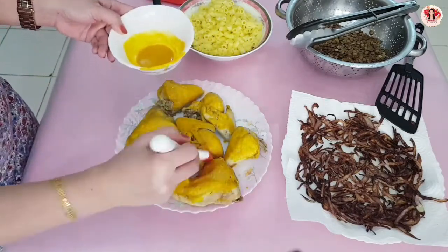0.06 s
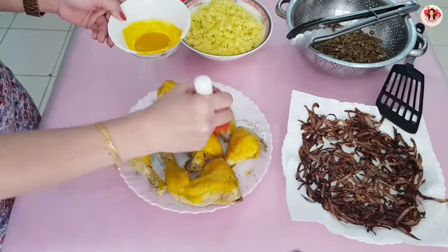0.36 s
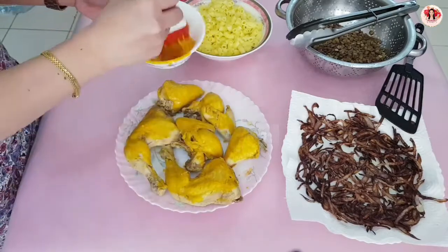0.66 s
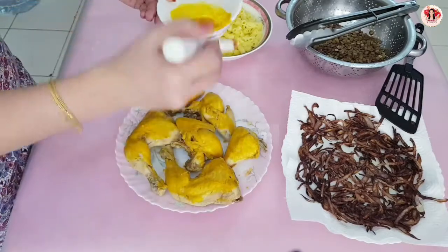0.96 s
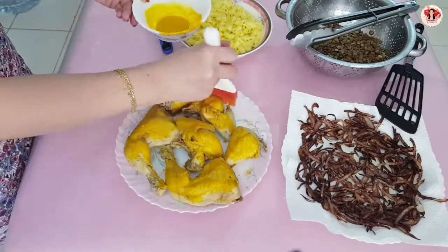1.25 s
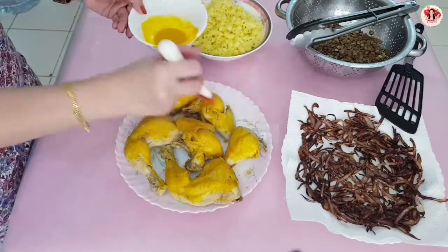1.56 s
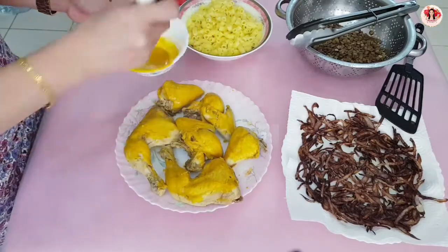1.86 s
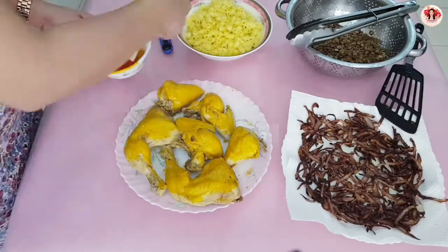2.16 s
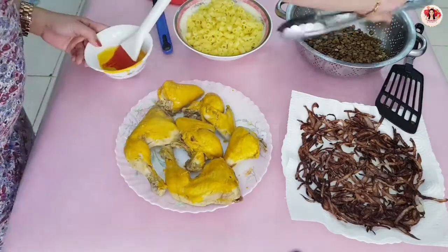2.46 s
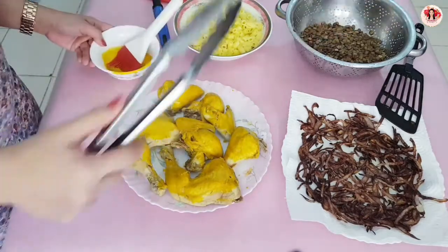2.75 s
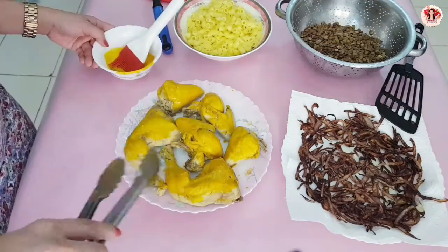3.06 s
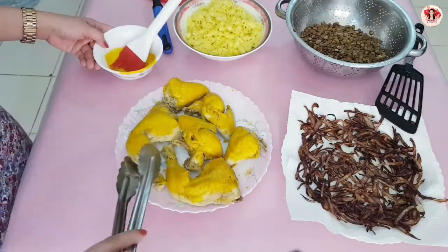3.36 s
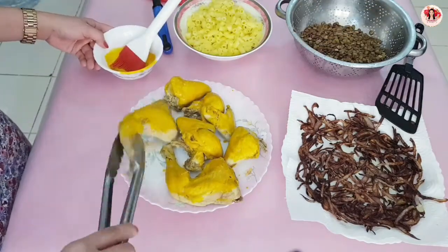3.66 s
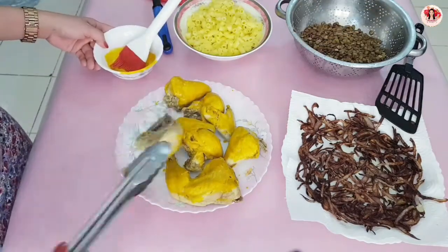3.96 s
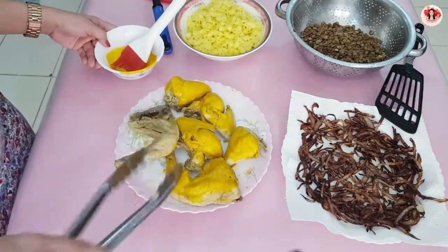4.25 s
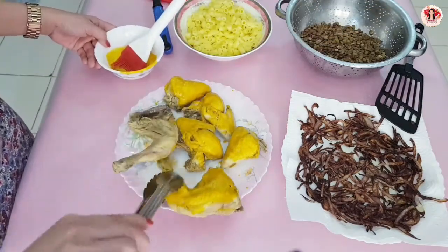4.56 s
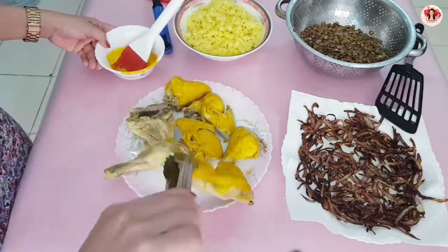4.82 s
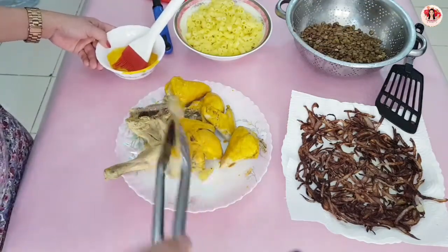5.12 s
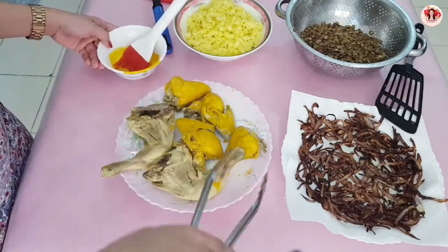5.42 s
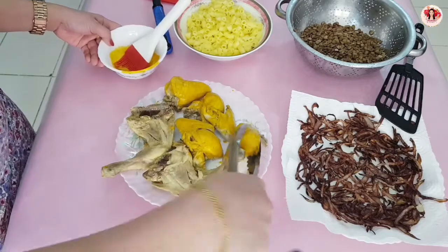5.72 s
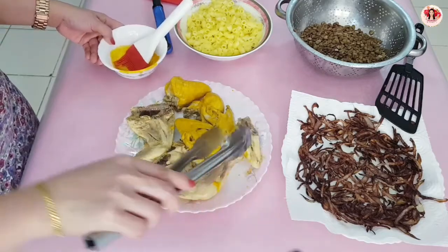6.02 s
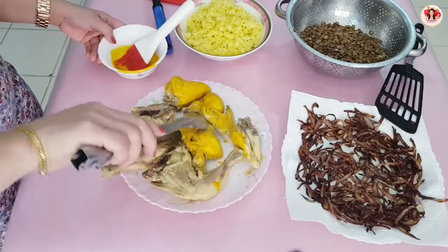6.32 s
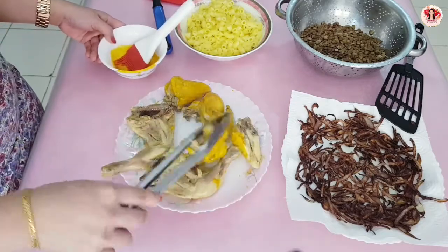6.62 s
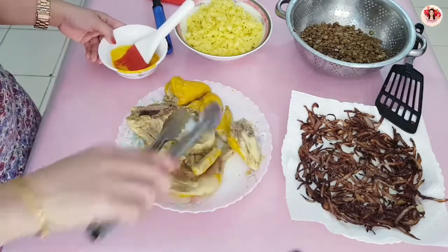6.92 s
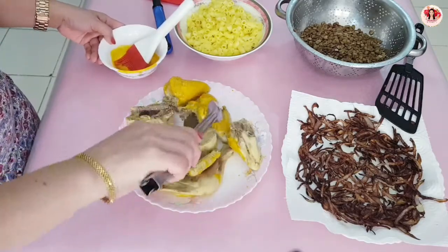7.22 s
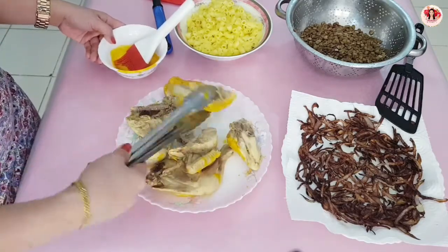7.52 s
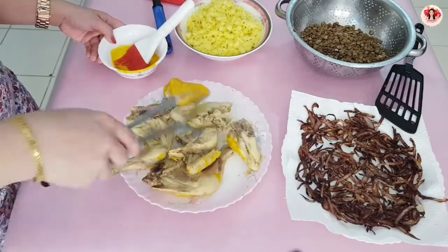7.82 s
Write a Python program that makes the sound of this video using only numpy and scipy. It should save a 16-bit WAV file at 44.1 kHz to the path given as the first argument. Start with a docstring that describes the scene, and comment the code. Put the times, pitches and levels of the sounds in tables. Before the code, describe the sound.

A fan runs throughout in a small, dry kitchen, giving a low hum, soft airflow and a faint tick about eleven times a second. For two seconds it is the only sound. At about 2.1 seconds a brush drops into a small china bowl with a bright, short clink, followed by a soft table thud. Steel tongs scrape and click as they are picked up between 2.5 and 3.1 seconds, with a brief sleeve swish near 2.8. They clack sharply against a plate at 3.2 seconds, with soft table thuds there and just after, then clack again at 4.2 and click at 4.4. From about 3.4 seconds wet chicken squelches quietly as it is turned. Lighter clicks and short scrapes continue, with plate taps near 5.9 and 7.1 seconds, and the sticky crackling grows slightly before the end near 8 seconds. All the handling sounds close.

```python
"""Steel tongs, taken from a colander, turn pieces of wet chicken on a plate: impacts excite the modes of
steel and china, utensils scrape by stick-slip friction, and peeling skin squelches. Just before, a brush
drops into a small china bowl, which rings; a sleeve swishes and the kitchen table thuds, all close by in
a small dry room. Behind them a fan hums over its airflow, and its guard ticks faintly on every turn."""
import sys
import numpy as np
from scipy import signal
from scipy.fft import rfft, irfft
from scipy.io import wavfile
from scipy.ndimage import uniform_filter1d

SR = 44100
rng = np.random.default_rng(int(sys.argv[2]) if len(sys.argv) > 2 else 0)


def waveform_to_disk(signal):
    """Save audio, clipped to [-1, 1], as 16-bit WAV at the path in sys.argv[1]."""
    frames = np.transpose(np.atleast_2d(signal))
    scaled = np.clip(frames, -1, 1) * 32767
    samples = np.round(scaled).astype(np.int16)
    wavfile.write(sys.argv[1], SR, samples)


N = 347508
SIZE = 16384  # samples in one short sound
T, HZ = np.arange(SIZE) / SR, np.fft.rfftfreq(SIZE, 1 / SR)


# Normal modes of the steel arms: f/Hz, relative level/dB, T60/s
TONGS_MODES = [(1078, 14, 0.059), (1786, 5.5, 0.041), (2100, -1, 0.021), (2600, 1, 0.028), (3030, 3, .1),
               (3380, 5, 0.1), (3840, 5, .05), (3990, 2, 0.053), (5450, -2, 0.05), (6050, 10, 0.049),
               (6600, 8, 0.037), (7150, 3, 0.067), (7580, 5, 0.11), (8900, 9, 0.055), (9890, -4, .1),
               (11050, 9, 0.07), (12300, -3, .12), (13900, 0, .08), (15000, -6, .1)]
# Clicks, mostly of the tongs; at 4.222 s a faint, short tick of hiss comes just before the loud clack:
# t/s, relative level/dB, low band re middle/dB, chatter time/s, ring f/Hz
CLICK_EVENTS = [(2.552, -41.5, -3, .005, 6760), (2.608, -47, -10, 0.0054, 7150),
                (2.6195, -32, -5.5, .002, 7150), (2.89, -49.5, -10, 0.0034, 9500),
                (2.942, -31, -19, .0057, 8650), (3.2187, -26.5, -3, 0.0012, 5730),
                (3.268, -52.5, 9, 0.0028, 1080), (3.734, -46.5, 1.5, .002, 4070),
                (4.222, -46, -7, 0.0062, 9500), (4.2407, -27.5, -9, 0.003, 2120),
                (4.4455, -35, -16, .0048, 1080), (4.573, -58, -11, .001, 7500),
                (4.905, -51.5, -13, 0.0016, 12000), (4.9959, -47.5, -10, .002, 8400),
                (5.436, -49, -3, 0.0023, 11300), (5.539, -54.5, -2, 0.00077, 4580),
                (5.6554, -43.5, -12, 0.0037, 9500), (6.664, -54, -7, .003, 2600),
                (6.748, -48, -5, .004, 2400), (7.038, -55, -4, .002, 3000), (7.188, -51, 3, .0034, 1400),
                (7.263, -55, -9, .002, 11000)]

def tongs_clicks(impacts, top_db=-0.8, ring_lift_db=9.5):
    """Impact excitation: the jaws chatter for a few milliseconds, which sets the steel arms ringing."""
    out = np.zeros((2, N))
    for start, db, low_db, chatter_s, ring_hz in impacts:
        age = T / chatter_s
        force = flatten(rfft(rng.standard_normal(SIZE) * (1 - np.exp(-3 * age)) * np.exp(-age)))
        arms = modal_response(TONGS_MODES, spread_db=3)
        freedom = amp(0.27 * min(db + 35, 0))  # light touches press into the meat, which damps the steel
        body = flatten(force * (1 + freedom * arms), bins=601)
        resonance = 1 + (amp(ring_lift_db) - 1) / (1 + 1j * (HZ - ring_hz) / 280)
        click = fixed_energy(waveform(body * contact_spectrum(low_db, top_db) * resonance))
        gain = amp(db - 2.5) * band_sum(low_db, top_db)
        add(out, start, kitchen(gain * click, near_db=2.5, tail_db=-2), pan_db=0.6)
    return out


def tongs_grazes(first_s=5.75, slot_s=0.14, low_db=2, chatter_s=0.0044):
    """Weak, damped impacts: the tips graze once in each time slot, at a random moment."""
    impacts = []
    for slot in np.arange(first_s, N / SR - slot_s, slot_s):
        start = slot + rng.uniform(0, slot_s)
        db, ring_hz = rng.uniform(-61.5, -59.5), rng.uniform(2500, 9700)
        impacts.append((start, db, low_db, chatter_s, ring_hz))
    return tongs_clicks(impacts)


# Utensils rubbing on steel, china and meat, starting with a faint hiss as the brush settles:
# start t/s, end t/s, relative level/dB, low band re middle/dB
UTENSIL_SLIDES = [(2.241, 2.52, -66, -8), (2.503, 2.609, -46, -6.5), (2.928, 2.967, -35, -14),
                  (3.038, 3.096, -41.5, -13), (3.445, 3.585, -53, -5.5), (3.72, 3.856, -46, -2),
                  (3.842, 3.911, -50, 1.5), (3.975, 4.043, -52, -1.5), (4.123, 4.162, -55.5, -2),
                  (4.643, 4.695, -52.5, -1), (4.904, 4.948, -55.5, 2.5), (4.991, 5.03, -52.5, -7),
                  (5.094, 5.151, -53.5, -3.5), (5.676, 5.717, -54.5, -4), (7.304, 7.353, -47, -5),
                  (7.478, 7.539, -47.5, -0.5), (7.708, 7.75, -49, -5)]

def utensil_scrapes():
    """Stick-slip friction: an uneven swell of tiny snaps, faintly coloured by steel resonances."""
    out = np.zeros((2, N))
    for start, end, db, low_db in UTENSIL_SLIDES:
        top_db = -1.5 - 0.28 * low_db  # the harder the surface, the less low band and the more top
        count = int(np.clip((end - start) * SR, SIZE // 64, SIZE * 2 // 3))
        pressure = signal.windows.tukey(count, 0.7) * amp(2 * slow_noise(count, span=400))
        slips = grains(count, per_s=3500, spread_db=1) * pressure
        body = flatten(1 + amp(-18) * modal_response(TONGS_MODES, spread_db=3))
        spectrum = rfft(slips, SIZE) * body * contact_spectrum(low_db, top_db)
        scrape = unit_rms(waveform(spectrum)) * np.sqrt(count / SIZE)
        gain = amp(db - 2.5) * band_sum(low_db, top_db)
        add(out, start, kitchen(gain * scrape, near_db=10, tail_db=-1.5), pan_db=0.6)
    return out


# Normal modes of the china bowl: f/Hz, relative level/dB, T60/s
BOWL_MODES = [(930, -14, .025), (1290, -12, 0.03), (1540, -6.5, 0.025), (1840, -6, 0.033),
              (2086, -3.5, 0.06), (2110, 3, 0.068), (2280, -3, 0.06), (3020, -6.5, 0.051),
              (3720, -12, 0.016), (4280, -11.5, 0.038), (5464, -1, 0.07), (5650, -8, .02), (5900, -12, .02),
              (6160, -10.5, 0.016), (7350, -18, .04), (8340, -13, .09), (9500, -18, .06), (10750, -22, .08),
              (11700, -17, .04), (12830, -16, .07), (13450, -15, .06), (14100, -17, .07), (15500, -19, .08)]
# Brush handle striking the bowl: t/s, level/dB, left minus right/dB
BRUSH_IMPACTS = [(2.1119, -22.5, 1.5)]

def bowl():
    """Free vibration: the bowl rings in its normal modes after the brush lands."""
    return struck_china(BOWL_MODES, BRUSH_IMPACTS, ring_db=0, crack_db=-0.5)


# Normal modes of the loaded plate: f/Hz, relative level/dB, T60/s
PLATE_MODES = [(1000, -3.5, 0.041), (1430, -12, 0.013), (1860, 4.5, 0.033), (2860, -4, .03),
               (3350, -5, 0.09), (4730, -3.5, 0.0084), (6140, -6, 0.012), (7340, -8, 0.041),
               (8650, -4, 0.067), (9500, -21, 0.077), (9640, -3, 0.13), (11700, -12, .03), (13460, -5, .04),
               (14300, -10, .03), (15300, -9, .03)]
# Tips of the tongs striking the plate: t/s, level/dB, left minus right/dB
PLATE_IMPACTS = [(3.2190, -36, -9), (4.2398, -37, 1), (5.906, -45, 1), (7.1295, -35.5, 2.5)]

def plate():
    """Damped vibration: the meat absorbs the ringing of the tapped plate."""
    return struck_china(PLATE_MODES, PLATE_IMPACTS, ring_db=-1, crack_db=-0.5)


def struck_china(modes, impacts, ring_db, crack_db):
    """Transient and modal decay: a hard crack, then a ring with its own phases in each channel."""
    out = np.zeros((2, N))
    hz, db, t60 = np.transpose(modes)[:, :, None]
    outline = np.sqrt((amp(db) ** 2 / (1 + ((HZ - hz) / 240) ** 4)).sum(0))  # modes blurred into bands
    delay = np.exp(-2j * np.pi * HZ * 0.000354)
    for start, level_db, pan_db in impacts:
        force = flatten(rfft(rng.standard_normal((2, SIZE)) * T * np.exp(-T / 0.00028)), bins=101)
        crack = waveform(force * outline * delay)
        cycles = hz * T + rng.random((2, len(hz), 1))
        tones = amp(db - 60 * T / t60) * np.sin(2 * np.pi * cycles) / np.sqrt(t60)
        strike = amp(ring_db) * fixed_energy(tones.sum(1)) + amp(crack_db) * fixed_energy(crack)
        add(out, start, kitchen(amp(level_db) * strike, near_db=-8, tail_db=-3.5), pan_db)
    return out


# How strongly the wet meat is stirred: t/s, relative level/dB
MEAT_ENVELOPE = [(3.4, -65.5), (3.8, -51.5), (4.2, -63), (5.1, -62), (5.45, -69), (6.3, -57.5),
                 (7.3, -58.5), (7.6, -50.5), (7.88, -50.5)]

def meat():
    """Adhesion and release: wet skin peels in sticky crackles while the pieces are turned."""
    spectrum = contact_spectrum(low_db=0.5, top_db=-2.5)
    squelch = rustle(MEAT_ENVELOPE, spectrum, per_s=1100, spread_db=4, lumpy_db=4.5)
    return amp([[-1.7], [-3.3]]) * squelch  # slightly to the left


# Spectrum of sliding fabric: f/Hz, relative spectral level/dB
SLEEVE_SPECTRUM = [(500, -22), (1000, 2.5), (1500, -5), (2200, 3), (3000, -7.5), (3900, -6), (4800, -16),
                   (11000, -17.5), (16000, -22)]

def sleeve(middle_s=2.82, half_s=0.099):
    """Friction noise: dense grains of rubbing fabric merge into a hiss, loudest in mid swing of the arm."""
    swing = np.linspace(-1, 1, 9)
    arch = np.transpose([middle_s + half_s * swing, -45 - 21 * swing ** 2])  # t/s, level/dB
    return rustle(arch, amp(log_interp(SLEEVE_SPECTRUM, HZ)), per_s=9000, spread_db=5, lumpy_db=2)


# Soft impacts on the table: t/s, level/dB, lowest mode f/Hz, T60/s
TABLE_IMPACTS = [(2.389, -31, 142, 0.094), (3.220, -39, 234, .1), (3.463, -41, 326, 0.048)]

def table_thuds():
    """Heavily damped modes: the table top answers soft weights with three low inharmonic partials."""
    out = np.zeros((2, N))
    for start, db, hz, t60 in TABLE_IMPACTS:
        phase = 2 * np.pi * hz * T
        partials = np.sin(phase) + amp(-6.5) * np.sin(1.57 * phase) + amp(-15) * np.sin(2.5 * phase)
        envelope = amp(-60 * T / t60) * (1 - np.exp(-T / 0.0019))
        add(out, start, amp(db) * fixed_energy(partials * envelope)[None], pan_db=0)
    return out


# Normal modes of the fan guard: f/Hz, relative level/dB, T60/s
GUARD_MODES = [(4150, -6, .009), (5250, 1, .014), (6680, -1.5, .011), (7150, -8, .014), (8400, -12, .004),
               (11900, -9, .005), (13000, -14, .005)]
# Hardest ticks of the guard: t/s, relative level/dB
GUARD_JOLTS = [(.325, -58), (.501, -52), (1.042, -57), (1.215, -58), (1.569, -56)]

def fan_ticks(turns_hz=11.26, first_s=0.056, spread_db=0.5):
    """Periodic forcing: once a turn the loose guard buzzes for a moment, never twice equally hard."""
    times = np.arange(first_s, N / SR - 0.01, 1 / turns_hz)
    regular = np.transpose([times, rng.normal(-55.5, spread_db, len(times))])
    kicks = np.zeros(N)
    for start, db in np.vstack([regular, GUARD_JOLTS]):
        kicks[round(start * SR)] += amp(db)
    envelope = np.exp(-T / 0.021) * (1 - np.exp(-T / 0.0084))
    buzz = rng.standard_normal(N) * signal.oaconvolve(kicks, envelope)[:N]
    contact = amp(-10) * contact_spectrum(low_db=-6, top_db=-2)
    guard = waveform(modal_response(GUARD_MODES, spread_db=0) + contact)
    ticks = amp(-1.5) * signal.oaconvolve(buzz, guard / np.linalg.norm(guard))[:N]
    return kitchen(ticks, near_db=-0.5, tail_db=-4)[:, :N]


def fan_hum(hum_hz=97.55, db=-54, waver_hz=2.8, waver_db=2):
    """Random modulation: the motor's low tone wavers in frequency and amplitude."""
    hz = hum_hz + waver_hz * slow_noise(N, span=6000)
    gain = amp(db + waver_db * slow_noise(N, span=6000))
    return gain * unit_rms(np.sin(2 * np.pi * np.cumsum(hz) / SR))


# Rumble and airflow of the fan: f/Hz, relative spectral level/dB
AIR_SPECTRUM = [(15, -50), (25, -15.5), (70, -10.5), (110, -2.5), (170, -6.5), (270, -15.5), (550, -20.5),
                (720, -20), (1020, -29), (2150, -32), (3100, -41), (6000, -46.5), (9000, -53.5),
                (16000, -52.5)]
# Resonances of the fan housing: f/Hz, width/Hz, lift/dB
HOUSING_RESONANCES = [(98.7, 11.2, 4), (645, 80, 7)]
# Likeness of the left and right channels: f/Hz, coherence
AIR_COHERENCE = [(60, 0.95), (110, 1), (290, 0.88), (400, 0.9), (640, 0.17), (1300, 0.062), (2400, 0.12),
                 (5000, 0.051)]

def fan_air(level_db=-39.5):
    """Partly coherent noise: airflow with two drones of the housing, its bass alike in both channels."""
    hz = np.fft.rfftfreq(N, 1 / SR)
    left, independent = rng.standard_normal((2, len(hz))) + 1j * rng.standard_normal((2, len(hz)))
    coherence = log_interp(AIR_COHERENCE, hz)
    right = coherence * left + np.sqrt(1 - coherence ** 2) * independent
    drones_db = sum(lift / (1 + (2 * (hz - f) / width) ** 2) for f, width, lift in HOUSING_RESONANCES)
    spectrum = np.array([left, right]) * amp(log_interp(AIR_SPECTRUM, hz) + drones_db)
    return amp(level_db) * unit_rms(irfft(spectrum, N))


# Reverberation time of the kitchen: f/Hz, T60/s
KITCHEN_T60 = [(200, 0.12), (900, 0.13), (2000, 0.21), (5000, 0.27), (9000, 0.19), (15000, 0.24)]

def kitchen(sound, near_db, tail_db):
    """Reverberation: reflections off table and dishes, then a short tail; both differ for each sound."""
    close, far = rng.standard_normal((2, 2, SIZE))
    near = waveform(flatten(rfft(close * (T > 0.0002) * np.exp(-T / 0.00094)), bins=601))
    hz, t, bands = signal.stft(far * (1 - np.exp(-T / 0.002)), SR, nperseg=256)
    decay = amp(-60 * t / log_interp(KITCHEN_T60, hz)[:, None])
    tail = signal.istft(bands * decay, SR, nperseg=256)[1][:, :SIZE]
    early = ((T == 0) + amp(near_db) * near / np.linalg.norm(near[0])) / np.sqrt(1 + amp(near_db) ** 2)
    response = early + amp(tail_db) * tail / np.linalg.norm(tail[0])
    return signal.fftconvolve(np.atleast_2d(sound), response, axes=1)


def rustle(curve, spectrum, per_s, spread_db, lumpy_db):
    """Shot noise on a level curve; its source wanders, so the reflections keep changing."""
    out = np.zeros((2, N))
    level_db = np.interp(np.arange(N) / SR, *np.transpose(curve), left=-120, right=-120)
    level_db += lumpy_db * slow_noise(N, span=900)
    colour = np.interp(np.fft.rfftfreq(N, 1 / SR), HZ, spectrum)
    snaps = irfft(rfft(grains(N, per_s, spread_db)) * colour, N)
    crackle = amp(level_db) * unit_rms(snaps)
    window = signal.windows.hann(SIZE, sym=False)
    for at in range(int(curve[0][0] * SR) - SIZE // 2, N, SIZE // 2):
        piece = crackle[at:at + SIZE]
        if at / SR < curve[-1][0]:
            add(out, at / SR, kitchen(piece * window[:len(piece)], near_db=16, tail_db=1.5), pan_db=0)
    return out


def grains(count, per_s, spread_db):
    """Poisson process of tiny snaps: many small, a few large."""
    size = amp(spread_db * np.minimum(rng.exponential(1, count), 4))
    return unit_rms(size * rng.choice([-1, 1], count) * (rng.random(count) < per_s / SR))


def modal_response(modes, spread_db):
    """Modal superposition: the point of contact sets the sign and strength of each mode at random."""
    hz, db, t60 = np.transpose(modes)[:, :, None]
    weight = amp(db + spread_db * rng.standard_normal(hz.shape)) * rng.choice([-1, 1], hz.shape)
    return (weight / (1 + 2j * np.pi * (HZ - hz) * t60 / np.log(1000))).sum(0)


def contact_spectrum(low_db, top_db):
    """Radiation efficiency shapes a contact's broad spectrum: thin steel radiates little bass."""
    points = [(200, low_db - 25), (700, low_db + 1.5), (1300, low_db + 3.5), (2300, low_db + 6),
              (3500, 0.005), (8000, 0), (10500, top_db + 0.5), (15500, top_db - 5)]
    return amp(log_interp(points, HZ))


def band_sum(low_db, top_db):
    """Power addition: gain of the low, middle and top bands together over the middle one."""
    return np.sqrt(1 + amp(low_db) ** 2 + amp(top_db) ** 2)


def flatten(spectrum, bins=301):
    """Spectral whitening: removes the broad slope and keeps the fine peaks."""
    return spectrum / np.sqrt(np.abs(uniform_filter1d(np.abs(spectrum) ** 2, bins)) + 1e-20)


def waveform(spectrum):
    """Inverse Fourier transform to a short sound, faded out at the end."""
    return irfft(spectrum) * np.clip(2 - 3 * T / T[-1], 0, 1)


def slow_noise(count, span):
    """Moving average of white noise over span samples, at rms 1."""
    return unit_rms(uniform_filter1d(rng.standard_normal(count), span))


def log_interp(points, hz):
    """Interpolation of (f/Hz, value) points on a log-frequency axis."""
    f, value = np.transpose(points)
    return np.interp(np.log(hz + 1), np.log(f + 1), value)


def amp(db):
    """Amplitude ratio of a level in decibels."""
    return 10 ** (np.asarray(db) / 20)


def unit_rms(x):
    """Normalisation to rms 1."""
    return x / np.sqrt(np.mean(np.abs(x) ** 2) + 1e-20)


def fixed_energy(x):
    """Normalisation to the energy of 20 ms at rms 1."""
    return x * np.sqrt(0.02 * SR / np.sum(x ** 2))


def add(mix, start, sound, pan_db):
    """Constant-power panning: mixes a sound in at its start time; pan_db is left minus right."""
    part = mix[:, max(round(start * SR), 0):][:, :sound.shape[1]]
    part += unit_rms(amp([[pan_db / 2], [-pan_db / 2]])) * sound[:, :part.shape[1]]


def scene():
    """Superposition: tongs and dishes close by, the fan across the room."""
    dishes = bowl() + plate()
    handling = tongs_clicks(CLICK_EVENTS) + utensil_scrapes() + meat() + sleeve() + table_thuds()
    fan = fan_ticks() + fan_hum() + fan_air()
    return handling + tongs_grazes() + dishes + fan


def record(dry, cutoff_hz=15950):
    """Band limiting: a steep low-pass filter removes the highest treble."""
    lowpass = signal.firwin(511, cutoff_hz, window=("kaiser", 9), fs=SR)
    return signal.oaconvolve(dry, lowpass[None], "same")


dry = scene()
out = record(dry)
waveform_to_disk(out)
```